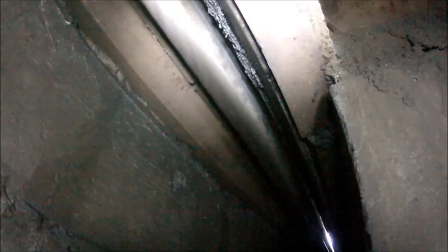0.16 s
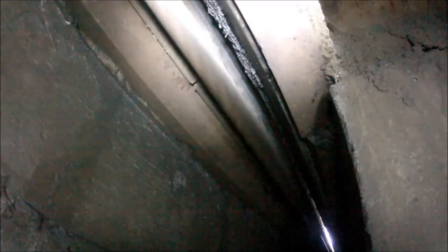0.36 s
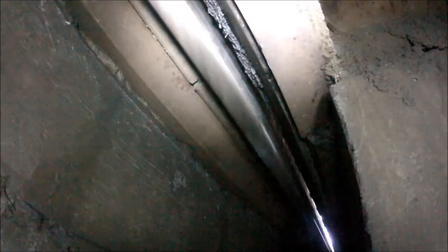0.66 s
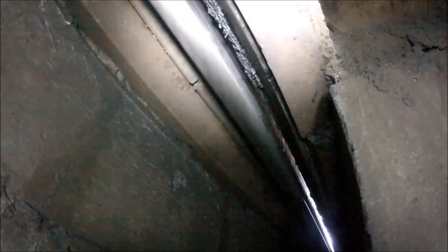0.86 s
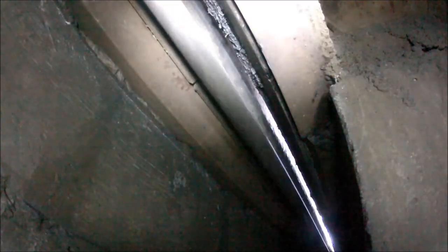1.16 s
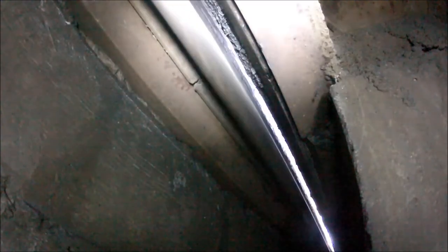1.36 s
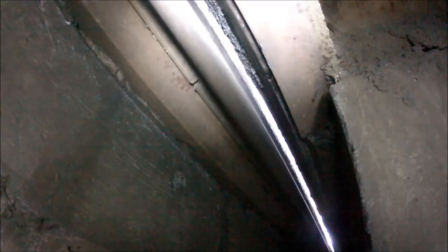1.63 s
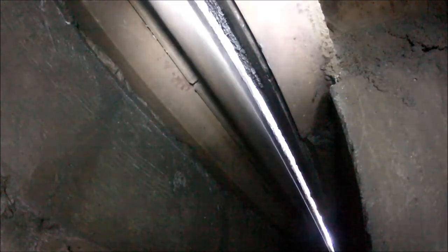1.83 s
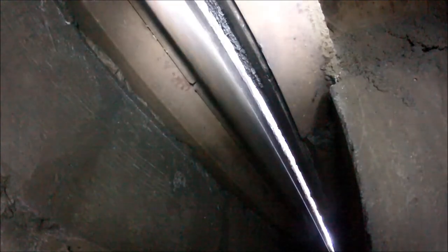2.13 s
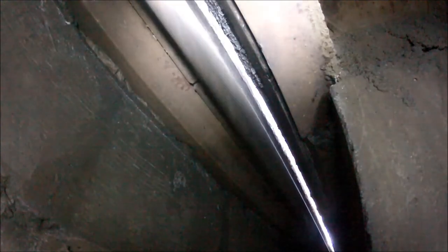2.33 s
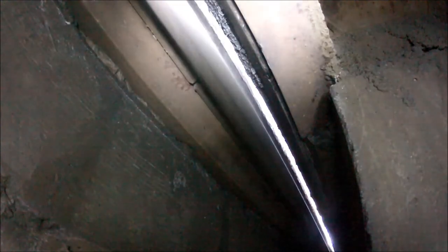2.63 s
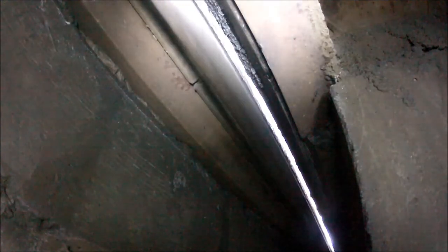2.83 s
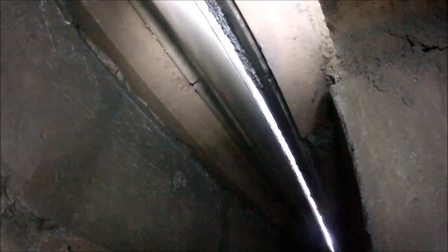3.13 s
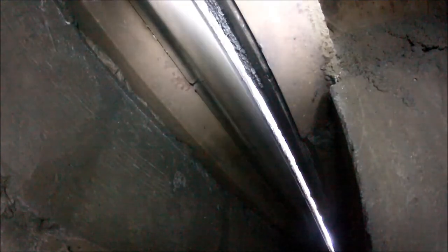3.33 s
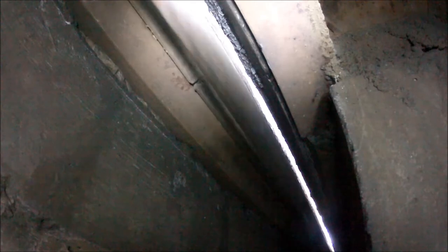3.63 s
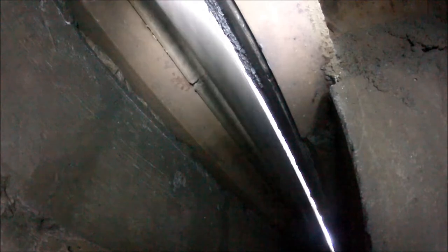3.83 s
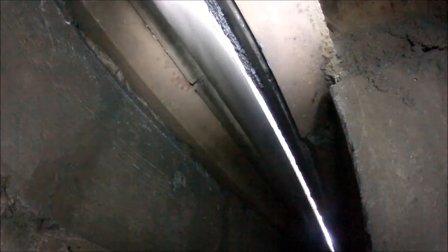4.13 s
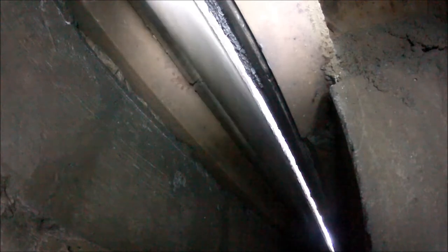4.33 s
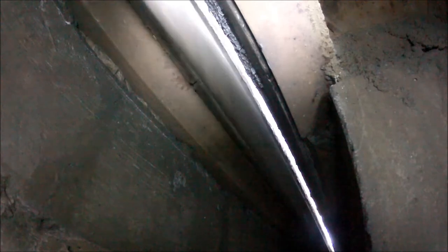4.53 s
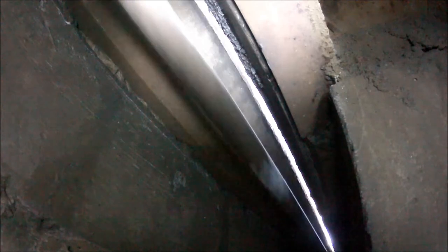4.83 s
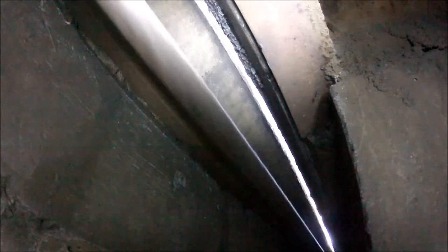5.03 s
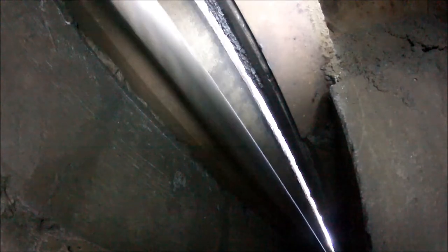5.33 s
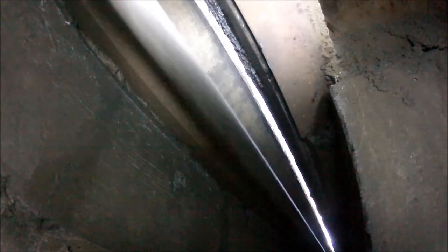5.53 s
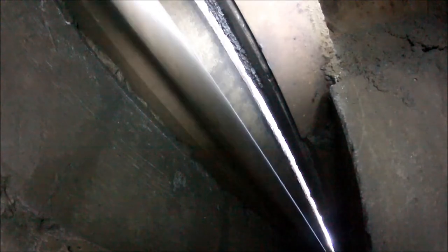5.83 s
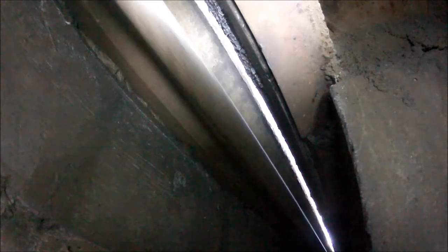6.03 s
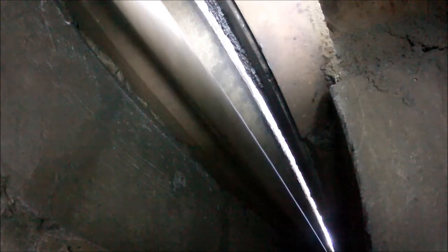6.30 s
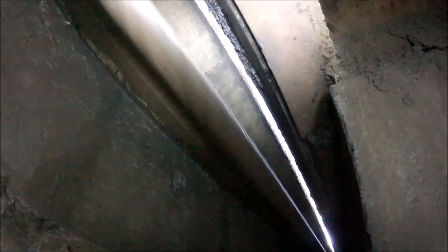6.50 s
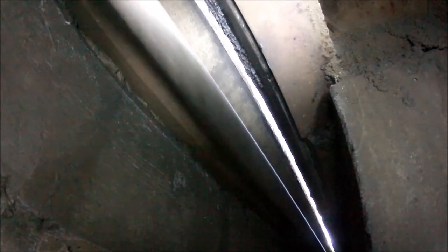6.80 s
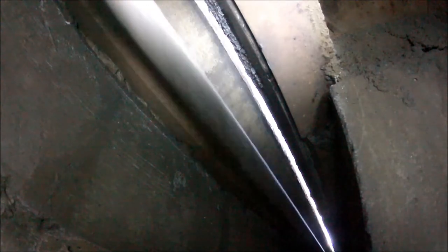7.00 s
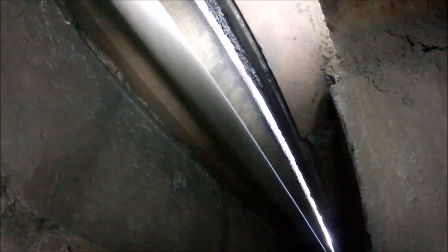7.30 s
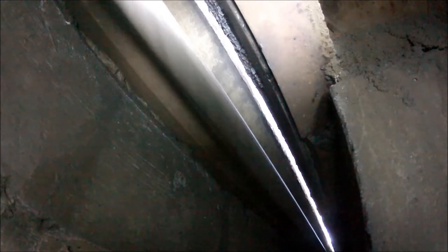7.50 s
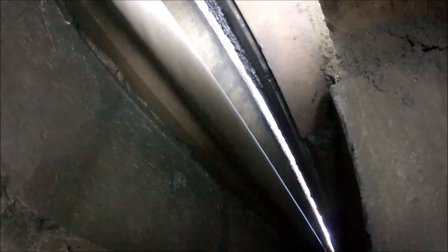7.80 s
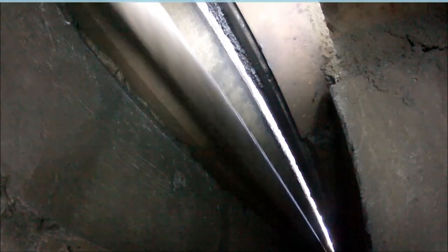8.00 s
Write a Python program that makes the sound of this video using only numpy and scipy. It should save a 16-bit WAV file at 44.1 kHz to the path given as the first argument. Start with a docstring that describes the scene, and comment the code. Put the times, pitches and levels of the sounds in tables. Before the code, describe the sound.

A running steel cable whines steadily in an underground conduit while a passing cable car rumbles and knocks, then fades.

```python
"""A steel haul cable runs over its sheaves in a concrete conduit under a street slot as a car rolls by.
The load rumbles and knocks in the conduit's low modes and dies away; the strands keep whining on the
steel, rough spots scrape, and a thin hum and faint hiss lie underneath.
A slow sample-and-hold mirrors the whole sound into the treble."""
import sys
import numpy as np
from scipy import signal
from scipy.fft import rfft, irfft
from scipy.io import wavfile
from scipy.ndimage import uniform_filter1d

SR = 44100
rng = np.random.default_rng(int(sys.argv[2]) if len(sys.argv) > 2 else 0)


def materialize(psi):
    """Save the field psi as 16-bit PCM at rate SR to the path in sys.argv[1].

    A 1-D psi becomes a single channel; in a 2-D psi each row is a channel.
    """
    bounded = np.clip(np.atleast_2d(psi).T, -1, 1)
    quanta = np.round(bounded * 32767).astype(np.int16)
    wavfile.write(sys.argv[1], SR, quanta)


N = 359402

# steel modes at the cable's near contact: (pitch [Hz], width [Hz], level [dB])
NEAR_MODES = [(1527, 64, -14.5), (1791, 61, -4.5), (1867, 44, -0.5), (2042, 140, -6), (2140, 100, -8),
              (2290, 98, -2), (2520, 114, -10), (2790, 41, -14.5), (2998, 51, -8.5), (3300, 440, -19.5),
              (3685, 37, -9)]


def load_rumble():
    """The rolling load shakes the ground and sets rail, conduit and yokes throbbing partly in step."""
    # load on the track: (time [s], ground thrum [dB], rail drone [dB], conduit boom [dB],
    # yoke clatter [dB])
    load_faders = [(0.0, -42, -32, -28.5, -36), (0.09, -28, -28, -30.5, -35.5),
                   (0.16, -33, -35, -31, -36.5), (0.48, -35.5, -29.5, -27.5, -34.5),
                   (0.57, -29, -26.5, -23.5, -30.5), (0.61, -22, -19, -23, -37),
                   (0.68, -31, -32, -26, -37.5), (0.86, -38.5, -27.5, -27, -35.5),
                   (1.09, -38, -24.5, -26.5, -33), (1.18, -30, -21.5, -17, -28.5),
                   (1.23, -32, -41, -27.5, -34), (1.29, -37.5, -29, -29.5, -32.5),
                   (1.52, -34, -27.5, -28.5, -33.5), (1.63, -41, -28.5, -30, -37.5),
                   (1.75, -29.5, -24.5, -24, -30), (1.93, -41, -31.5, -35, -40), (2.11, -39, -28, -25, -37),
                   (2.22, -28, -35, -32, -32), (2.29, -33.5, -20, -24, -34), (2.38, -29, -29.5, -32, -35),
                   (2.45, -31, -26, -26.5, -32.5), (2.63, -34, -32.5, -28, -38.5),
                   (2.65, -35, -27, -14.5, -31), (2.7, -39, -31, -24, -32),
                   (2.77, -30.5, -31.5, -22, -34.5), (2.93, -31, -25.5, -20.5, -30.5),
                   (2.95, -30, -34, -25, -33), (3.04, -33, -36, -29.5, -33.5),
                   (3.22, -29, -26.5, -25, -33.5), (3.27, -31, -36, -28, -33.5),
                   (3.4, -27.5, -28.5, -17.5, -27.5), (3.49, -28.5, -24, -28, -35),
                   (3.65, -35, -26, -25.5, -33.5), (3.72, -26.5, -28, -19, -21),
                   (3.88, -24.5, -34, -24, -31.5), (4.08, -33.5, -29, -24, -28),
                   (4.11, -33.5, -29, -29.5, -33.5), (4.38, -25.5, -31.5, -25.5, -31),
                   (4.49, -36.5, -34, -28, -36), (4.58, -29.5, -27.5, -21, -31.5),
                   (4.65, -30, -33, -33, -33), (4.67, -27, -22, -20, -25), (4.72, -31.5, -35, -28.5, -27.5),
                   (4.86, -27, -28, -25, -33.5), (5.06, -29, -32, -29, -31.5), (5.13, -32, -32, -25, -34),
                   (5.17, -30, -24, -24.5, -25), (5.36, -31.5, -38, -30.5, -36.5),
                   (5.56, -37.5, -37, -30.5, -37.5), (5.61, -34.5, -29, -23, -36),
                   (5.76, -32, -30, -35, -40), (5.81, -34, -37, -34.5, -28.5), (5.92, -30, -31, -28, -42),
                   (5.97, -27.5, -36, -31.5, -35), (6.11, -33, -34, -26.5, -36),
                   (6.13, -29, -33.5, -28.5, -30), (6.47, -33, -41, -37, -43),
                   (6.6, -33, -31, -23.5, -40.5), (6.72, -38.5, -43, -34.5, -45.5),
                   (6.81, -40, -33, -31, -41), (6.88, -39.5, -45, -33.5, -43), (7.03, -42, -38, -34, -47),
                   (7.17, -37.5, -44, -35.5, -50), (7.31, -42, -39, -43, -48),
                   (7.38, -40.5, -46, -39, -46.5), (7.9, -42.5, -44, -39.5, -51.5),
                   (7.97, -42, -51, -39, -49), (8.04, -33.5, -41, -41, -51), (8.15, -42, -40, -36, -44)]
    # modes of the four bodies: (pitch [Hz], width [Hz], level [dB])
    ground_modes = [(51.4, 6.9, -1.5), (70, 12.4, 1.5), (98.4, 31, -4), (125, 21.3, -3)]
    rail_modes = [(165.7, 20, -9.5), (181.2, 13.4, 1), (192, 11, -4.5), (208.6, 17.5, -10.5)]
    conduit_modes = [(256.6, 19, -3), (280.6, 29.6, -5.5), (306.4, 15.1, 0), (324.4, 16.2, -5),
                     (352.5, 32, -15.5)]
    yoke_modes = [(420, 31, -5), (453.2, 19, -3), (477.7, 18.5, 0.5), (514, 46, -9.5), (584, 18.2, -2.5),
                  (621, 35, -15), (701, 46, -16.5), (782, 97, -28.5), (872, 28, -20.5)]
    ground_db, rail_db, conduit_db, yoke_db = in_time(load_faders)
    throb = from_db(2.38 * drift(20.2))
    return (from_db(ground_db) * rubbed(ground_modes, 1, flicker_db=0.5, steady=0.6)
            + from_db(rail_db) * rubbed(rail_modes, throb, flicker_db=-3.3, steady=0.99)
            + from_db(conduit_db) * rubbed(conduit_modes, throb, flicker_db=2.2, steady=0.72)
            + from_db(yoke_db) * rubbed(yoke_modes, throb, flicker_db=1.5, steady=0.43))


def track_knocks():
    """Every blow through the track thuds; bright ones clank as well."""
    # blows: (time [s], relative level [dB], brightness [dB])
    blows = [(0.52, -15, -2), (0.597, -12.5, -6), (0.802, -5.5, -9), (0.867, -6, -7), (1.086, -21, -7),
             (1.158, -7, 1.5), (1.319, -6.5, -17), (1.444, -3.5, -2), (1.513, -13, 0), (1.737, -16.5, 10),
             (1.863, -12.5, -5), (1.973, -5.5, -17), (2.277, -7, 1), (2.455, -8, 0), (2.652, -7, 4),
             (2.83, -23, -6), (3.36, -17, 3), (3.672, -7.5, -6), (3.825, -3.5, -5), (3.919, -1, -1.5),
             (4.058, -5, 0.5), (4.279, -11, -6), (4.33, -12, -2), (4.375, -12.5, 7.5), (4.557, -5, -9),
             (4.667, -3.5, 2.5), (4.755, -5.5, 3), (4.798, -8, -3), (4.949, -7.5, -4), (5.168, -12, 4),
             (5.59, -7, -2), (5.678, -7.5, 0.5), (5.808, -21, -3), (6.086, -10, 0), (6.528, -13.5, -11),
             (6.784, -14, 1)]
    # low and mid modes of the track: (pitch [Hz], width [Hz], level [dB])
    thud_modes = [(185, 39, -9), (292.5, 58, -2.5)]
    clank_modes = [(477, 35, 1), (589, 36, -3), (736, 65, -13.5), (1046, 57, -8)]
    times, level_db, bright_db = np.transpose(blows)
    thud = struck(thud_modes, times, level_db - 5, lowpass_hz=368)
    clank = struck(clank_modes, times, level_db + bright_db - 18, lowpass_hz=1210)
    return thud + clank


def strand_whine():
    """Twisted strands pass unevenly over two steel contacts; the friction pulses once per strand."""
    # strands on steel: (time [s], sheave ring [dB], whine [dB], squeal [dB])
    rub_faders = [(0.0, -46.5, -43, -67), (0.43, -43.5, -40, -59.5), (0.57, -40.5, -41.5, -64),
                  (0.59, -40, -39, -55), (0.66, -42.5, -39, -63), (1.09, -44.5, -41, -63),
                  (1.18, -38.5, -40.5, -65), (1.25, -46, -40, -69), (1.31, -47, -43.5, -67),
                  (1.95, -42.5, -41.5, -73), (2.02, -49, -42, -62), (2.06, -42, -40, -65),
                  (2.11, -45.5, -42.5, -76), (2.72, -45, -44, -71), (2.74, -48, -45, -66),
                  (2.79, -40.5, -42, -60), (2.97, -47, -44, -74), (3.24, -43.5, -45, -78),
                  (3.31, -45, -43.5, -61), (3.4, -37, -43.5, -71), (3.47, -47.5, -45.5, -75),
                  (3.72, -38.5, -43.5, -75), (3.86, -45, -44.5, -64), (4.06, -40, -43.5, -70),
                  (4.11, -48.5, -44.5, -65), (4.63, -43.5, -43, -65), (4.65, -56, -43, -73),
                  (4.67, -35.5, -39, -67), (4.79, -42.5, -39, -67), (5.08, -44, -43, -71),
                  (5.54, -49, -43.5, -73), (5.65, -46.5, -44, -81), (5.74, -47.5, -41, -75),
                  (6.13, -45.5, -43.5, -74), (6.15, -47, -41.5, -66), (6.49, -46, -47, -75),
                  (6.74, -51.5, -44.5, -77), (6.79, -38, -42.5, -72), (6.81, -50.5, -46.5, -75),
                  (7.67, -50, -44, -83), (8.15, -50, -43, -75)]
    # crossfade from the near to the far contact: (time [s], near share [0-1])
    crossfade = [(0, 0.55), (1.5, 0.8), (2.5, 0.46), (4.8, 0.6), (5.6, 0.14), (8.15, .05)]
    # modes of the rubbed steel: (pitch [Hz], width [Hz], level [dB])
    far_modes = [(1782, 38, -7), (1935, 210, -10.5), (2233, 30, -4), (2283, 50, -3), (2367, 43, -1.5),
                 (2479, 40, -9), (2600, 107, -14.5), (2962, 71, -16), (3087, 37, -14), (3234, 53, -15),
                 (3520, 71, -19.5), (3727, 98, -21.5), (3890, 61, -23)]
    sing_modes = [(2352, 16, 1.5), (2287, 32, -7)]
    sheave_modes = [(1056, 93, 1.5), (1258, 54, -4.5), (1382, 57, -14)]
    squeal_modes = [(4950, 50, -4), (5150, 120, -5), (5230, 50, -4.5), (5290, 70, -1.5)]
    sheave_db, whine_db, squeal_db = in_time(rub_faders)
    near_share = in_time(crossfade)[0]
    strands_per_s = 110 * (1 + 0.0538 * drift(14.5))
    strands_passed = np.cumsum(strands_per_s) / SR
    friction = from_db(4.8 * np.cos(2 * np.pi * strands_passed) + 1.07 * drift(14.4))
    near = np.sqrt(near_share) * rubbed(NEAR_MODES, friction, flicker_db=1.0, steady=0.3)
    far = np.sqrt(1 - near_share) * rubbed(far_modes, friction, flicker_db=1.5, steady=0.23)
    # the far sheave sings, free of the strand pulse
    sing = (1 - near_share) * from_db(-7) * rubbed(sing_modes, 1, flicker_db=-0.5, steady=0.72)
    return (from_db(whine_db) * (near + far + sing + hiss())
            + from_db(sheave_db) * rubbed(sheave_modes, friction, flicker_db=-1.0, steady=0.5)
            + from_db(squeal_db) * rubbed(squeal_modes, friction, flicker_db=0.5, steady=0.4))


def cable_snags():
    """Rough spots scrape a contact: a light one rings mostly one mode, a broad one more of the steel."""
    # rough spots: (time [s], relative level [dB], decay [s], breadth [0-1])
    rough_spots = [(0.4628, -22.5, 0.018, 0.35), (0.5706, -28, 0.02, 0.4), (0.581, -23.5, 0.02, 0.5),
                   (2.05, -20.5, 0.02, 0.45), (4.6674, -36, 0.016, 0.4), (4.76, -38, 0.018, 0.35),
                   (5.092, -26, 0.013, 0.2), (5.39, -26, 0.02, 0.2), (6.498, -23, 0.014, 0.2),
                   (7.115, -23.5, 0.017, 0.2), (7.39, -29, 0.029, 0.46), (8.084, -24.5, 0.018, 0.3)]
    # top modes that only snags reach: (pitch [Hz], width [Hz], level [dB])
    top_modes = [(4420, 370, -23.5), (5070, 220, -25)]
    t, noise = np.arange(N) / SR, rng.standard_normal(N)
    start, level_db, decay, breadth = np.transpose(rough_spots)[:, :, None]
    bursts = from_db(level_db - 8.5) * (t >= start) * np.exp(-np.maximum(t - start, 0) / decay)
    bursts = uniform_filter1d(bursts, size=250, axis=1)   # the grip takes a few ms to bite

    def all_steel(x):
        return sum(from_db(db) * resonate(x, hz, 0.98 * width) for hz, width, db in NEAR_MODES + top_modes)

    def main_mode(x):
        return resonate(x, hz=2260, width=160)

    broad = all_steel((breadth * bursts).sum(axis=0) * noise)
    light = main_mode(((1 - breadth) * bursts).sum(axis=0) * noise)
    return broad / np.std(all_steel(noise)) + light / np.std(main_mode(noise))


def tick(at_s=0.494, hz=5850):
    """One short, bright tick: a sine under a bell-shaped envelope."""
    t = np.arange(N) / SR
    envelope = np.exp(-((t - at_s) / 0.002) ** 2)
    return from_db(-45) * envelope * np.sin(2 * np.pi * hz * t)


def cable_hum():
    """The running cable hums on thin wavering tones, whatever the load."""
    # hum tones: (pitch [Hz], width [Hz], level [dB])
    tones = [(134.8, 7, -47), (194.4, 6.3, -45), (266, 2.3, -57), (317.2, 8, -50), (592.4, 8, -61.5),
             (5450, 27, -76.5)]
    return sum(from_db(db) * rubbed([(hz, width, 0)], 1, flicker_db=2.8, steady=0.73)
               for hz, width, db in tones)


def hiss():
    """A faint noise bed fills the gaps between the modes; its level is relative to the whine."""
    # noise colour: (frequency [Hz], relative level [dB])
    eq_curve = [(20, 14), (40, 16.5), (200, -14), (1500, -6), (3000, 2), (4200, -10), (5000, -12.5),
                (5800, -10.5), (5980, -21)]
    hz, db = np.transpose(eq_curve)
    bin_hz = np.maximum(np.fft.rfftfreq(N, 1 / SR), 1)
    eq = from_db(np.interp(np.log(bin_hz), np.log(hz), db, right=-60))
    level = from_db(-10.5 + 1.26 * drift(8))
    return level * rms_one(irfft(rfft(rng.standard_normal(N)) * eq, N))


def rubbed(modes, friction, flicker_db, steady):
    """Friction noise feeds each mode; the contact evens out the swings by `steady` (0-1); rms 1."""
    pre_roll = SR // 4
    friction = np.pad(friction * np.ones(N), (pre_roll, 0), "edge")
    rings = np.zeros(N)
    for hz, width, db in modes:
        level = from_db(db + flicker_db * drift(8.1))
        drive = friction * rng.standard_normal(N + pre_roll)
        rings += level * resonate(drive, hz, width)[pre_roll:]
    power = uniform_filter1d(uniform_filter1d(rings ** 2, size=3000), size=3000)
    return rms_one(rings / (power + 1e-20) ** (steady / 2))


def struck(modes, times, level_db, lowpass_hz):
    """Soft blows, each striking every mode with a strength of its own."""
    onsets = np.round(times * SR).astype(int)
    scatter = rng.normal(0, 1.93, (len(onsets), len(modes)))
    rings = np.zeros(N)
    for (hz, width, db), scatter_db in zip(modes, scatter.T):
        clicks = np.zeros(N)
        clicks[onsets] = from_db(level_db + db + scatter_db) * SR / (4 * width)
        rings += resonate(clicks, hz, width)
    return signal.sosfilt(signal.butter(4, lowpass_hz, fs=SR, output="sos"), rings)


def resonate(x, hz, width):
    """A resonance applied twice: unity peak, steep skirts, a ring that swells before it dies."""
    r = np.exp(-np.pi * 1.55 * width / SR)
    gain = (1 - r * r) / 2
    section = [gain, 0, -gain, 1, -2 * r * np.cos(2 * np.pi * hz / SR), r * r]
    return signal.sosfilt([section, section], x + 1e-18)


def drift(rate_hz):
    """Random modulation: noise through a double one-pole low-pass, rms 1."""
    hop, pre_roll = 40, 2000
    r = np.exp(-2 * np.pi * rate_hz * hop / SR)
    noise = rng.standard_normal(N // hop + pre_roll + 2)
    slow = signal.lfilter([1], [1, -2 * r, r * r], noise)[pre_roll:]
    return np.interp(np.arange(N) / hop, np.arange(len(slow)), rms_one(slow))


def in_time(rows):
    """Breakpoints to automation curves, one per column after the time."""
    times, *columns = np.transpose(rows)
    return [np.interp(np.arange(N) / SR, times, column) for column in columns]


def from_db(db):
    """Decibels to gain."""
    return 10 ** (np.asarray(db) / 20)


def rms_one(x):
    """Normalise to rms 1."""
    return x / np.sqrt(np.mean(x ** 2) + 1e-20)


def scene():
    """Everything in the conduit, mixed to mono."""
    return (load_rumble() + cable_hum() + track_knocks() + strand_whine() + cable_snags() + tick())[None]


def record(dry):
    """Sampling at 12 kHz and holding for four steps at 48 kHz adds mirrored treble; the top is cut."""
    slow = signal.resample_poly(dry, 40, 147, axis=1, window=("kaiser", 3.0))
    held = np.repeat(slow, 4, axis=1)
    mirrored = signal.resample_poly(held, 147, 160, axis=1)[:, :N]   # back to SR
    high_cut = signal.ellip(14, 0.5, 70, 15330, fs=SR, output="sos")
    return signal.sosfilt(high_cut, mirrored)


dry = scene()
out = record(dry)
materialize(out)
```